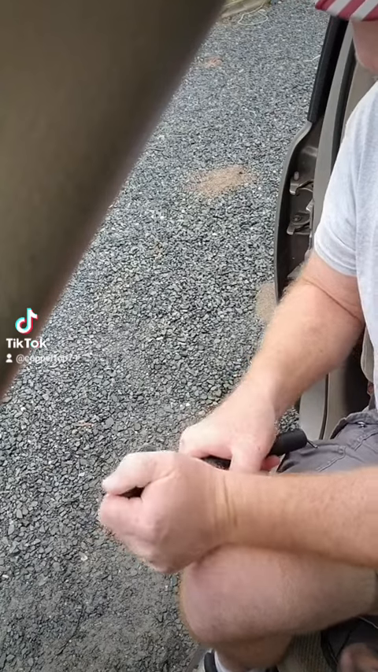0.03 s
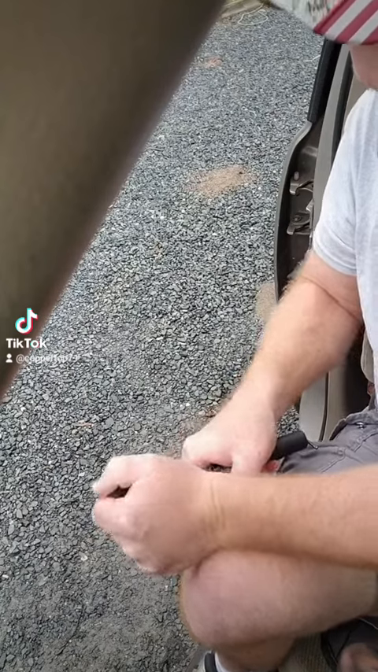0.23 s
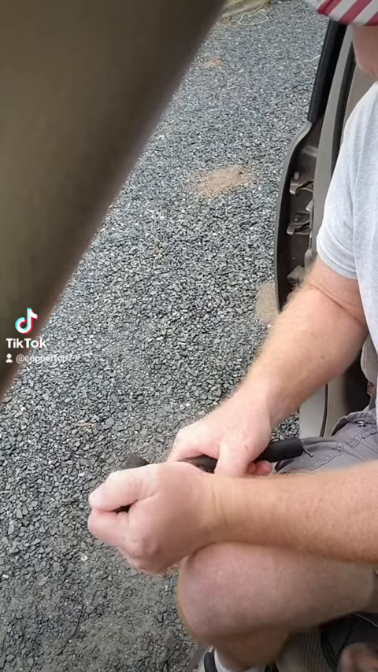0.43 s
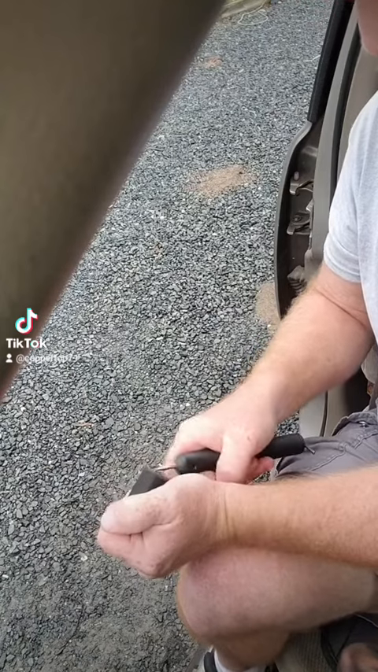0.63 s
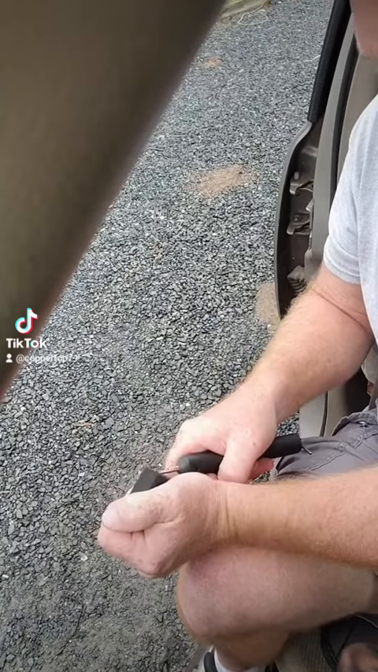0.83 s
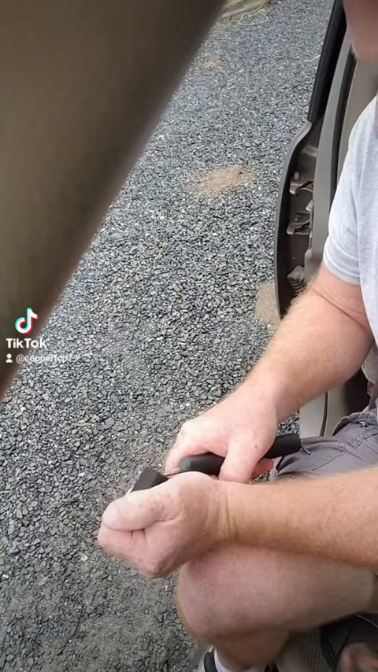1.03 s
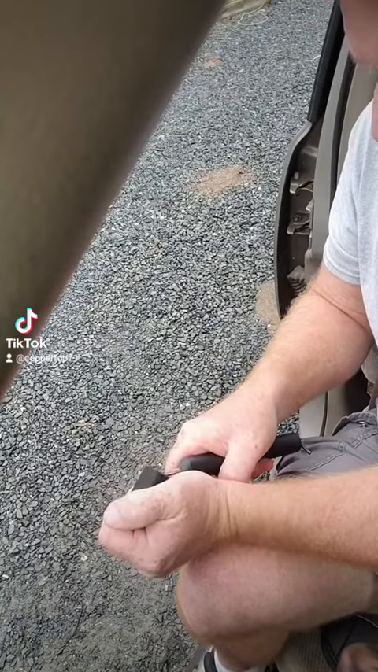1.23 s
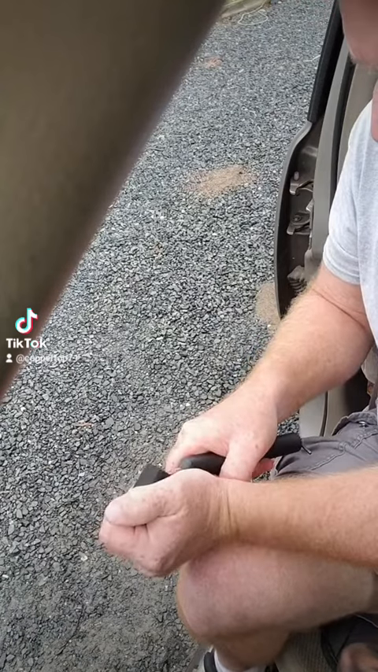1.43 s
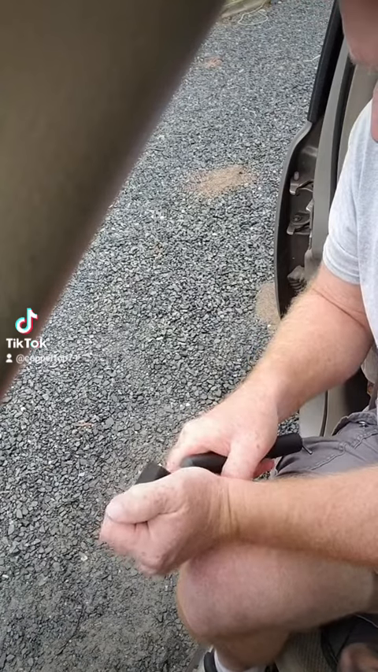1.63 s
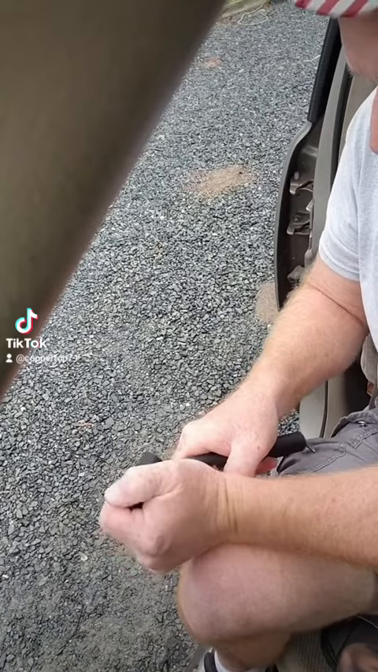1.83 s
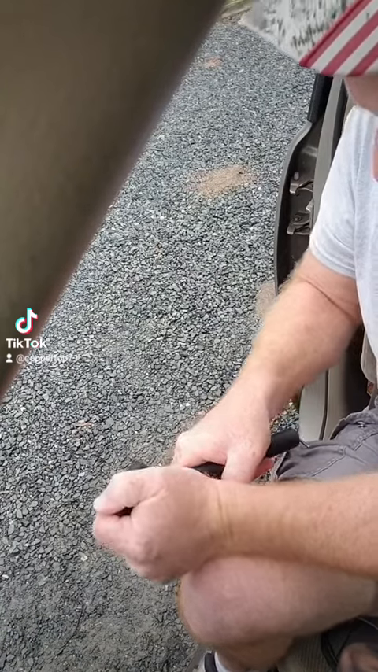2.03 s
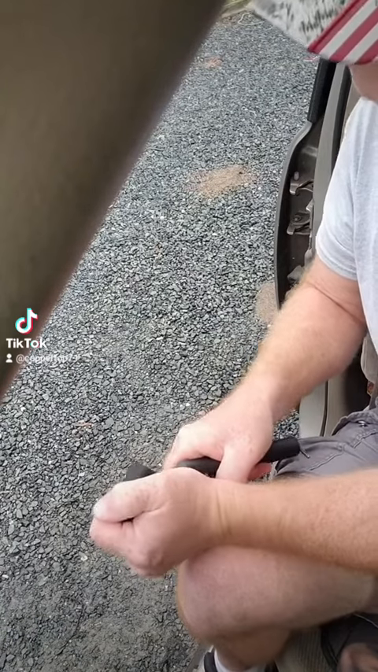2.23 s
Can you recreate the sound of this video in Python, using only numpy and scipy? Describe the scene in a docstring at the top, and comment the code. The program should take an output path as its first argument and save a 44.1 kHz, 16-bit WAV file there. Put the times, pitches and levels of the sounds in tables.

```python
"""Pressure flaking outdoors: a hand tool bites on the edge of a flint, which crushes until a flake snaps off.
Over low hum, a faint whistle, quiet air and thin hiss, a far chirp leads to a loud snap: crushing noise, an
impulse and chips ring damped modes of stone and tool, with noise echoes and dull thuds, decaying sines, of
the hands. Lesser clicks follow amid a second chirp, then a soft rub of filtered noise, a third chirp and a
faint tick. A second loud snap comes near 2 s, again with thuds, and a weaker click ends the scene."""
import sys
import numpy as np
from scipy import signal
from scipy.fft import rfft, irfft
from scipy.io import wavfile
from scipy.ndimage import uniform_filter1d

SR = 44100
rng = np.random.default_rng(int(sys.argv[2]) if len(sys.argv) > 2 else 0)


def wav_record(signal):
    """Record a signal, one row per channel, as 16-bit PCM in the file named by sys.argv[1]."""
    frames = np.transpose(np.atleast_2d(signal))
    bounded = np.clip(frames, -1, 1)
    # unit amplitude maps onto the largest positive 16-bit level
    quanta = np.round(bounded * 32767).astype(np.int16)
    wavfile.write(sys.argv[1], SR, quanta)


N = 101430  # samples


def flint(t):
    """Brittle fracture: crushing, snap and scattering chips sound directly and excite the stone's modes."""
    # Clicks of tool on stone. Each row: start in seconds, level in dB, lows below 1 kHz in dB,
    # body near 1.5 kHz in dB, treble in dB, crushing and chips in dB, right side in dB,
    # right side treble in dB.
    clicks = [(0.2258, 0.5, 3.5, 0, 2.5, 3.5, 0, 1), (0.431, -45.5, -21, 6.5, -13, 25, 1, -5),
              (.4930, -40.5, -20, 16, -14, 1.5, 1, -5), (0.5261, -17.5, -16, -20, -17, -14, -5.5, -0.5),
              (0.5287, -15, -20.5, -5.5, -14, 5.5, -5, 1), (1.7640, -53.5, 1, -1.5, -4, 7, 4, 8),
              (1.9930, -0.5, -0.5, -1, 3.5, 1.5, 0.5, -3), (2.2873, -28.5, -11.5, 5, -19.5, 8.5, -0.5, -3)]
    # Modes of the held stone and tool. Each row: frequency in Hz, level over the direct crack in dB,
    # time to decay by 60 dB in seconds.
    modes = [(1282, 7, .042), (1560, 6, 0.024), (2299, 2.5, .045), (2645, 1.5, .042), (2825, 6, .028),
             (3130, -9, .035), (3438, -6, 0.016), (3680, 2.5, 0.037), (3750, -4, .03), (4180, -1.5, 0.032),
             (4540, -3, .04), (4802, 3, .025), (6250, 1, 0.036), (7000, -6.5, 0.038)]
    # Colour of a snap at the two sides. Each row: frequency in Hz, left gain in dB, right gain in dB.
    crack_colour = [(96.97, -2.5, 5), (260, 0.5, 6.5), (325, -7, -5), (430, 6.5, 8), (736, 5.5, 3),
                    (1076, -0.5, 3), (1324, -4.5, 15.5), (1900, 1, 13), (2435, 19.5, 13.5),
                    (3000, 17, 10.5), (3800, 18.5, 5.5), (4610, 9, -8), (6320, 12, -11),
                    (9450, -1.5, -19.5), (13500, 5, -15), (15870, 1.5, -15.5)]
    crack_db = 1
    crush_db, crush_rise_s, crush_treble_db = -19.5, .0036, -5  # the edge crumbles just before it gives
    split_db, split_s, split_end_s = -11.5, .0021, .0005  # the crack runs through the stone
    debris_db, debris_s = -24.5, .0065  # chips scatter after it

    drive = np.zeros((2, N))
    for start, db, low_db, body_db, treble_db, crumble_db, right_db, right_treble_db in clicks:
        age = t - start
        crush = grit() * swell(age, crush_rise_s, split_end_s)
        crush = colour(crush, [3000, 9000], [crush_db, crush_db + crush_treble_db])
        running = (age > 0) * np.exp(-np.maximum(age - split_s, 0) / split_end_s)
        split = undb(split_db) * rng.choice([-1, 1], N) * running
        debris = undb(debris_db) * grit() * swell(age, 1 / SR, debris_s)

        force = split + undb(crumble_db) * (crush + debris)
        force[int(start * SR)] += 1  # the snap itself is an impulse
        tone_db = [low_db, body_db, 0, 0, treble_db]
        force = undb(db) * colour(even(force), [1110, 1550, 2300, 3900, 8000], tone_db)
        right = undb(right_db) * colour(force, [2800, 4200], [0, right_treble_db])
        drive += [force, right]

    ringing = sum(undb(db) * ring(drive, hz, t60) for hz, db, t60 in modes)
    hz, *sides_db = np.array(crack_colour).T
    snaps = [colour(side, hz, db) for side, db in zip(drive + ringing, sides_db)]
    return undb(crack_db) * np.array(snaps)


def grit():
    """Random superposition: dense tiny fractures of either sign and uneven size, rms 1."""
    spread_db = 6
    sizes = undb(spread_db * rng.standard_normal(N))
    return unit(rng.choice([-1, 1], N) * sizes)


def even(x):
    """Spectral whitening: give a burst equal energy over broad bands while keeping its fine structure."""
    band_bins = int(450 * N / SR)  # each smoothing spans 450 Hz
    spectrum = rfft(x)
    power = uniform_filter1d(abs(spectrum) ** 2, size=band_bins)
    return irfft(spectrum / np.sqrt(uniform_filter1d(power, size=band_bins)), N)


def echoes(x, t):
    """Diffuse reflection: convolution with a decaying noise tail, different on each side."""
    # Colour of the reflections. Each row: frequency in Hz, gain in dB.
    echo_colour = [(200, 5), (1500, -1.5), (3000, -2.5), (7000, 1), (14000, 7)]
    near_db, near_s, gap_s = -18.5, .010, .009  # close surfaces throw the snap back
    far_db, far_s = -29, .035  # a faint late tail from farther off, relative to the near one
    envelope = blow(t, gap_s, near_s) + undb(far_db) * blow(t, gap_s, far_s)
    out = []
    for side in x:
        tail = rng.standard_normal(N) * envelope
        tail = colour(tail / np.linalg.norm(tail), *np.array(echo_colour).T)
        out.append(signal.fftconvolve(side, tail)[:N])
    return undb(near_db) * np.array(out)


def hands(t):
    """Damped oscillation and friction: the hands jolt against the leg and the tool rubs on the pad."""
    # Dull thuds. Each row: start in seconds, level on the right in dB, pitch in Hz,
    # rise in seconds, decay in seconds.
    thud_rows = [(.232, -24.5, 85.4, 0.0093, 0.025), (0.264, -27.5, 42.1, 0.019, 0.03),
                 (.528, -33.5, 75, 0.011, 0.019), (0.608, -43, 253.4, 0.0031, 0.017),
                 (1.914, -46.5, 197.4, .004, 0.021), (2.015, -33, 90.3, 0.0053, 0.025),
                 (2.037, -34.5, 42.3, 0.009, 0.062), (2.257, -31.5, 78.1, 0.01, .05)]
    # The tool slides off and rubs on the pad. Each row: start in seconds, level in dB, decay in seconds.
    rub_rows = [(.613, -54, .04)]
    # Colour of the rubbing. Each row: frequency in Hz, relative level in dB.
    rub_colour = [(100, -4), (270, 2.5), (450, -4.5), (1000, -15), (2000, -9.5), (3400, -18), (3680, 1.5),
                  (4000, -14), (6500, -29), (10000, -36), (15000, -28)]
    thud_left_db, rub_rise_s = -9, .0085

    thuds = 0
    for start, db, hz, rise, fall in thud_rows:
        age = t - start
        thuds = thuds + undb(db) * blow(age, rise, fall) * np.sin(2 * np.pi * hz * age)
    friction = unit(colour(rng.standard_normal(N), *np.array(rub_colour).T))
    rubs = friction * sum(undb(db) * blow(t - start, rub_rise_s, fall) for start, db, fall in rub_rows)
    return undb([[thud_left_db], [0]]) * thuds + rubs


def chirps(t):
    """Narrow-band noise under amplitude modulation: thin, fluttering far calls, louder on the left."""
    # Far calls. Each row: time of the envelope's peak in seconds, level before flutter in dB, pitch in Hz.
    call_rows = [(.160, -52, 5130), (.475, -59, 5130), (1.125, -54, 5150)]
    rise_s, fall_s, width_hz = .017, .022, 260
    right_db, flutter_db = -14, 3
    calls = sum(undb(db) * swell(t - peak, rise_s, fall_s) * narrow(hz, width_hz)
                for peak, db, hz in call_rows)
    return undb([[0], [right_db]]) * calls * undb(flutter_db * walk(80))


def outdoors(t):
    """Superposition of background sources: quiet air, a thin steady hiss, a low hum and a faint whistle."""
    return air(t) + hiss() + hum_and_whistle(t)


def air(t):
    """Partial coherence: filtered noise, most shared by the two sides at low frequencies."""
    # Colour of outdoor air. Each row: frequency in Hz, relative left level in dB, relative right level in dB.
    air_colour = [(20, -10.5, -3.5), (56.5, -3.5, 0), (110, -9.5, -6.5), (150, -14.5, -11.5),
                  (294, -30.5, -27), (700, -33.5, -27), (1240, -43, -33.5), (1496, -41.5, -25.5),
                  (2260, -41.5, -26), (3460, -37, -37), (4620, -39, -42), (5850, -42.5, -54),
                  (8400, -58.5, -60.5), (15300, -54, -54)]
    # Slow course of the air. Each row: time in seconds, level change in dB.
    air_course = [(0, 1.5), (.35, 0), (.9, 1), (1.25, 2), (1.9, 1.5), (2.15, -0.5)]
    level_db, shared_power, shared_hz = -55.5, .6, 400
    hz, *sides_db = np.array(air_colour).T
    share = shared_power / (1 + (hz / shared_hz) ** 2)
    common = rng.standard_normal(N)
    sides = []
    for db in sides_db:
        shared = colour(common, hz, db + 10 * np.log10(share))
        separate = colour(rng.standard_normal(N), hz, db + 10 * np.log10(1 - share))
        sides.append(shared + separate)
    course_db = np.interp(t, *np.array(air_course).T)
    return undb(level_db + course_db) * unit(np.array(sides))


def hiss():
    """Band-limited noise: a thin steady hiss, independent on each side and louder on the left."""
    left_db, right_db = -72.5, -17  # the right is relative to the left
    sides = np.array([narrow(5170, 260) for _ in range(2)])
    return undb([[left_db], [left_db + right_db]]) * sides


def hum_and_whistle(t):
    """Modulation: low sine tones and a faint whistle near 1 kHz drift in pitch and waver in level."""
    # Tones of hum and whistle. Each row: mean frequency in Hz, then left and right levels in dB
    # before waver and course.
    tones = [(65.3, -62.5, -49), (114.8, -68.5, -58), (167.5, -81.5, -68.5), (997, -92, -83)]
    # Slow course of all the tones. Each row: time in seconds, level change in dB.
    tone_course = [(0, -2.5), (.3, -3.5), (.7, 1.5), (.85, -4.5), (1.6, -3), (2.3, -3)]
    drift_hz, waver_db = 1.5, 3.5
    total = 0
    for hz, left_db, right_db in tones:
        phase = 2 * np.pi * np.cumsum(hz + drift_hz * walk(17)) / SR
        tone = np.sqrt(2) * np.sin(phase)  # rms 1
        total = total + undb([[left_db], [right_db]]) * tone * undb(waver_db * walk(18))
    return total * undb(np.interp(t, *np.array(tone_course).T))


def undb(db):
    """Logarithmic level: convert decibels to an amplitude ratio."""
    return 10 ** (np.asarray(db) / 20)


def unit(x):
    """Mean power: scale a signal to rms 1."""
    return x / np.sqrt(np.mean(x ** 2))


def colour(x, hz, db):
    """Minimum-phase filtering: a causal response, built from the cepstrum, through (Hz, dB) points."""
    size = 2 * N
    f = np.maximum(np.arange(N + 1) * SR / size, 1)
    gain_db = np.interp(np.log(f), np.log(hz), db)
    cepstrum = irfft(np.log(undb(gain_db)))
    cepstrum[1:N] *= 2
    cepstrum[N + 1:] = 0
    return irfft(rfft(x, size) * np.exp(rfft(cepstrum)))[:N]


def narrow(hz, width_hz):
    """Resonant selection: noise in one narrow band, rms 1."""
    f = np.arange(N // 2 + 1) * SR / N
    response = 1 / (1 + ((f - hz) / width_hz) ** 2) ** 2
    return unit(irfft(rfft(rng.standard_normal(N)) * response, N))


def walk(rate):
    """Low-pass fluctuation: slow random drift from about rate fresh values a second, rms 1."""
    k = int(SR / rate)
    steps = np.repeat(rng.standard_normal(N // k + 1), k)
    return unit(uniform_filter1d(steps, k)[:N])


def ring(x, hz, t60):
    """Damped resonance: one complex pole gives a decaying mode, gain about 1 at its centre."""
    pole = np.exp((2j * np.pi * hz - np.log(1000) / t60) / SR)
    return 2 * (1 - abs(pole)) * signal.lfilter([1], [1, -pole], x).real


def swell(age, rise, fall):
    """Exponential growth and decay: rise to a peak at age 0, then fall."""
    return np.exp(np.maximum(np.minimum(age / rise, -age / fall), -60))


def blow(age, rise, fall):
    """Damped impact envelope: smooth onset at age 0 and exponential decay."""
    age = np.maximum(age, 0)
    return (1 - np.exp(-(age / rise) ** 2)) * np.exp(-age / fall)


def delay(x, seconds):
    """Fourier shift theorem: a linear phase moves a sound by a fraction of a millisecond."""
    f = np.arange(N // 2 + 1) * SR / N
    return irfft(rfft(x) * np.exp(-2j * np.pi * f * seconds), N)


def scene():
    """Linear superposition: snaps and their echoes over the hands and the outdoor background."""
    t = np.arange(N) / SR
    left, right = flint(t)
    left_delay_s = .00009  # a fixed delay of the left side sets the phase between the sides
    snaps = np.array([delay(left, left_delay_s), right])
    return snaps + echoes(snaps, t) + hands(t) + chirps(t) + outdoors(t)


def record(dry):
    """Saturation and band limiting: the microphone rounds the loudest peaks and cuts the top."""
    top_hz = 16200
    low_pass = signal.ellip(8, .2, 70, top_hz, fs=SR, output="sos")  # ripple .2 dB, stop band 70 dB down
    return signal.sosfilt(low_pass, np.tanh(dry))


dry = scene()
out = record(dry)
wav_record(out)
```